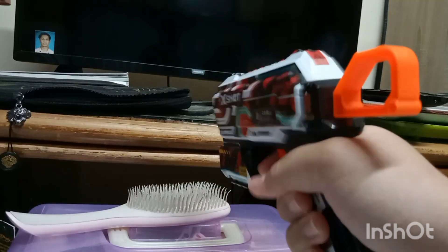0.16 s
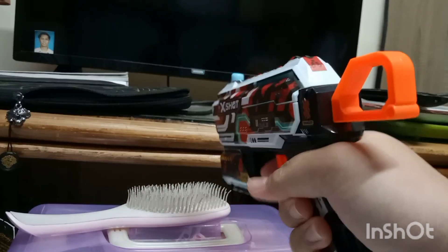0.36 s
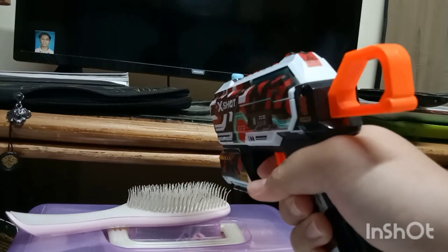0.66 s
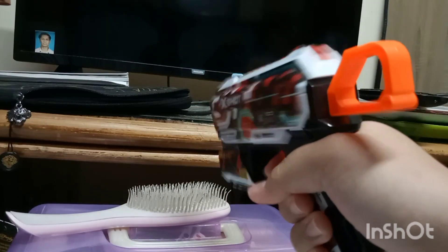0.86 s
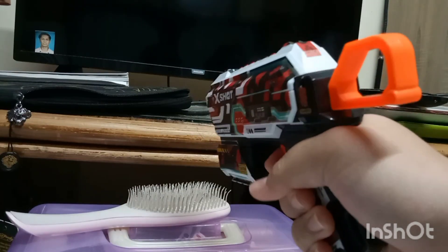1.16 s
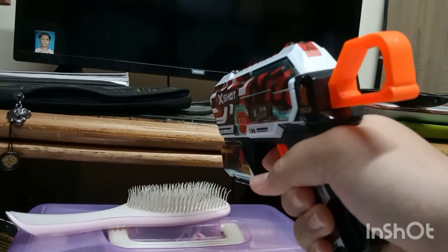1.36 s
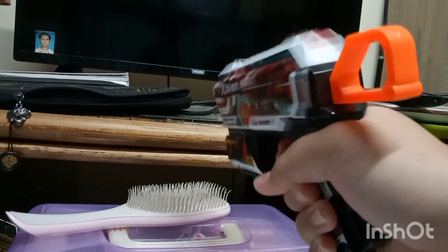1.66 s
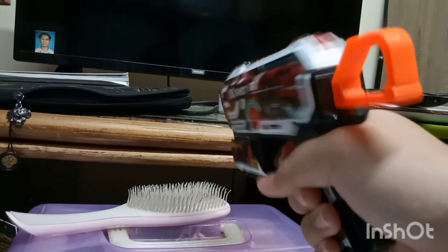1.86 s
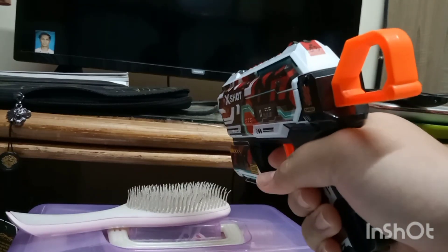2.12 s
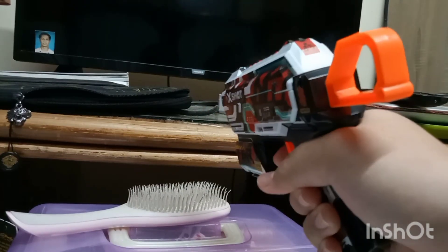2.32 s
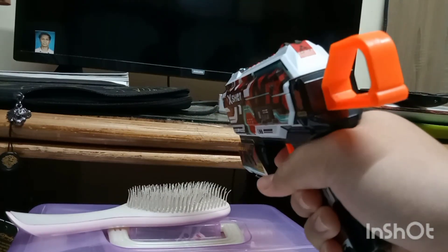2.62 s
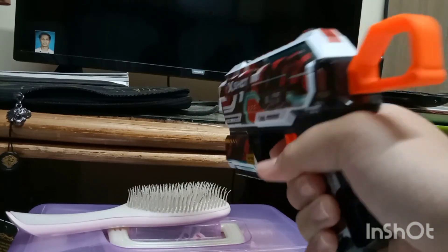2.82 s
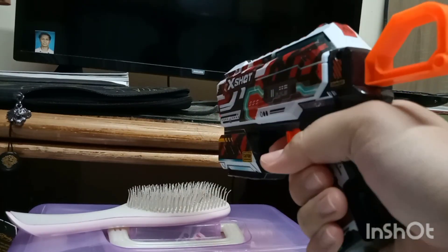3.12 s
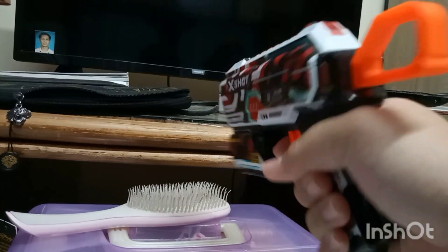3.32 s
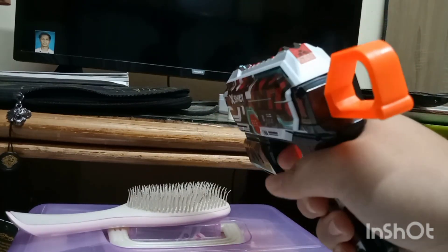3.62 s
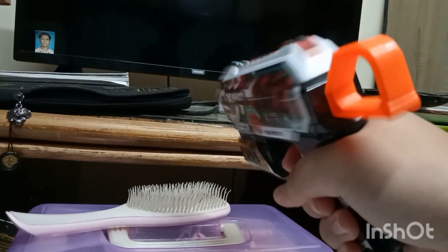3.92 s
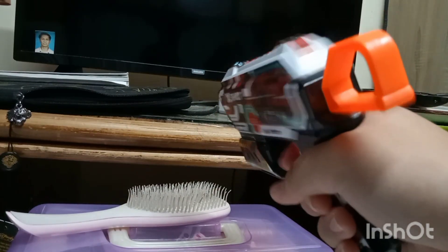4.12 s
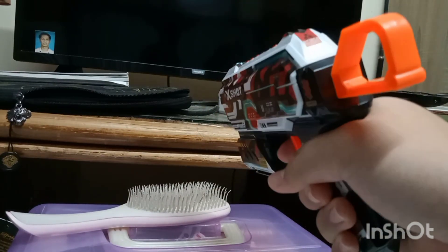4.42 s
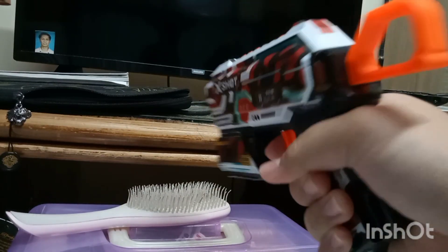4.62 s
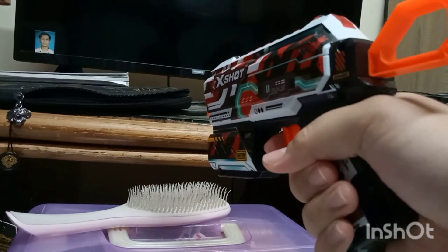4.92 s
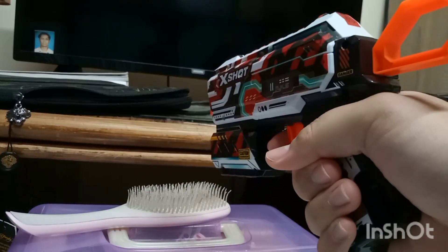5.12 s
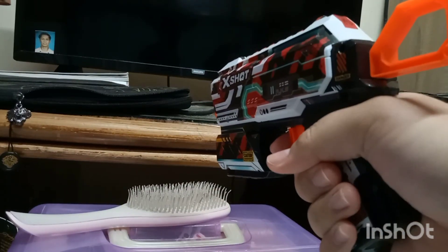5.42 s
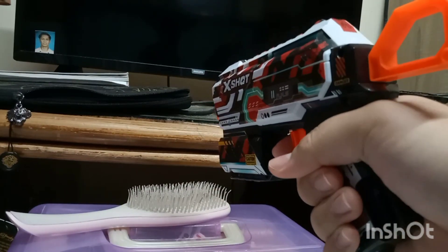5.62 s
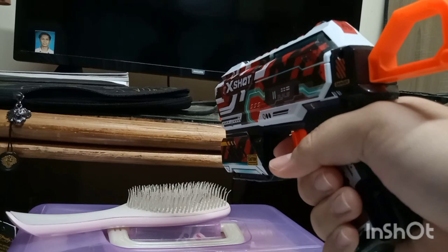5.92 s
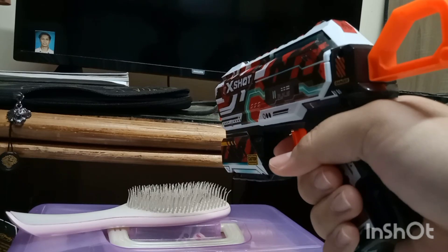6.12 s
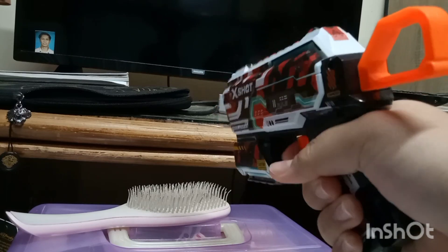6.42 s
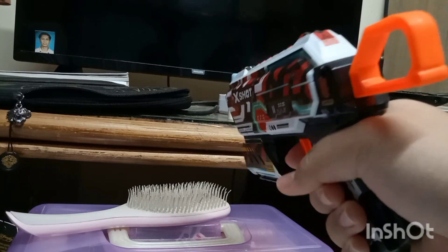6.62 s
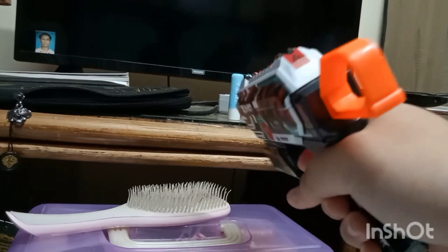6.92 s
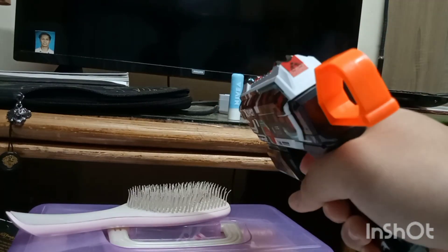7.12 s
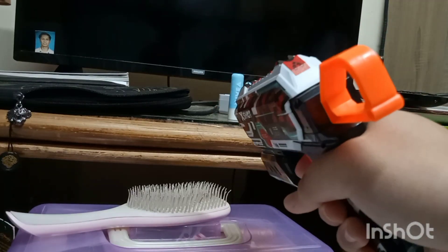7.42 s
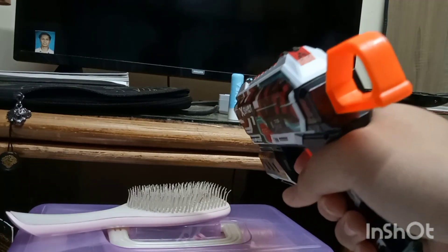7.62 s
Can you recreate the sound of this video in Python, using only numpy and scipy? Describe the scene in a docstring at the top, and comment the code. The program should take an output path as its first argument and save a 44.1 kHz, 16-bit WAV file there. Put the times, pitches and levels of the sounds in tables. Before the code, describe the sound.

A plastic spring toy blaster is dry-fired eleven times, close to the microphone in a small room. Each shot is a tight cluster: a trigger clack, a sharp snap, then a hollow pop with a brief spring shudder and a ring from the plastic shell. Just afterwards the slide ticks and slaps home, rasping into the next pull when the firing is quick. Three pairs come first, at about 0.3 and 0.5 seconds, 1.0 and 1.2, and 1.8 and 2.0. After a pause, four rapid shots run from 3.6 to 4.3 seconds, followed by a couple of very faint handling ticks. A last single shot comes at 6.4 seconds, with the slide returning at 6.6. The clicks have a short room echo. A faint low hum continues throughout, swelling slightly while the blaster is worked, and remains alone until the end, near 8 seconds.

```python
"""Spring blaster, dry-fired

A plastic spring blaster fired eleven times in a small room, close to a single microphone. On each pull
the trigger clacks, the drawn spring knocks, the sear snaps, then the plunger pops and its spring shudders.
On release the pawl ticks twice and the slide slaps home; in quick fire it rasps on into the next pull.
The room answers every click, and a faint hum underneath swells while the blaster is worked."""
import sys
import numpy as np
from scipy import signal
from scipy.fft import rfft, irfft
from scipy.io import wavfile
from scipy.ndimage import uniform_filter1d, minimum_filter1d

SR = 44100
rng = np.random.default_rng(int(sys.argv[2]) if len(sys.argv) > 2 else 0)


def master(y):
    """Save y as 16-bit WAV."""
    cut = np.clip(np.atleast_2d(y).T, -1, 1)
    pcm = np.round(cut * 32767)  # scale
    wavfile.write(sys.argv[1], SR, pcm.astype(np.int16))


N = 342216

# Room tone. Each row: frequency in Hz, relative level in dB.
AIR_COLOUR = [(25, -32), (60, -21), (110, -17), (185, -4.5), (300, -15.5), (450, -16.5), (750, -12.5),
              (1250, -14.5), (1650, -17.5), (2100, -30), (3300, -30), (4200, -36), (5500, -33),
              (8000, -42.5), (16000, -41.5)]
# The hum at rest, before any swell. Each row: time in seconds, level in dB.
HUM_LEVELS = [(0, -63.5), (3.4, -66), (7.76, -64)]
# Decay of the small room. Each row: frequency in Hz, seconds to fall 60 dB.
ROOM_T60 = [(300, 0.16), (800, 0.23), (2000, 0.15), (5500, 0.23), (14600, 0.21)]
# Tone of its reflections. Each row: frequency in Hz, relative level in dB.
ROOM_COLOUR = [(200, -5.5), (600, 8), (1000, 0.5), (2000, 1.5), (4000, -2), (8000, -5), (15000, 6.5)]
# Each plastic contact, heard close up. Each row: frequency in Hz, relative level in dB.
TRIGGER_COLOUR = [(100, -33.5), (330, -39), (600, -24.5), (950, 0.5), (1700, -12), (2200, -2), (3100, 1),
                  (4100, -4), (6200, 0), (7000, -7.5), (10000, -12.5), (11500, -28), (15000, -15.5)]
SEAR_COLOUR = [(100, -41.5), (600, -27), (1100, -11), (1900, -16), (2500, -8), (3100, -12), (3500, -1),
               (4000, -14.5), (5200, -1.5), (6000, 2), (6900, -18), (10000, -14), (11500, -27),
               (15000, -23.5)]
PAWL_COLOUR = [(100, -41.5), (330, -34.5), (600, -30), (1000, -2.5), (1600, -13.5), (2300, -8), (3200, 2),
               (4200, -7.5), (5500, 0.5), (7000, -5.5), (10000, -12), (11500, -22.5), (15000, -14.5)]
SLIDE_COLOUR = [(100, -37.5), (330, -38), (550, -26.5), (1000, -4), (1600, -9), (2000, -8.5), (3100, -5.5),
                (4300, -10), (5700, -1.5), (6300, -3.5), (6900, -11), (10000, -15), (11500, -26),
                (15000, -20.5)]
CRACK_COLOUR = [(100, -39.5), (350, -32.5), (900, 0.5), (1700, -2), (2400, -6), (3000, -1.5), (4200, -8),
                (6000, -0.5), (7000, -10.5), (10000, -13.5), (11500, -24.5), (15000, -19.5)]
# Resonance of the air in the barrel. Each row: frequency in Hz, relative level in dB.
BARREL_COLOUR = [(60, -46.5), (330, -46), (450, -29.5), (650, -23.5), (850, -3.5), (1050, 2.5),
                 (1280, -4.5), (1550, -17), (2500, -34.5), (6000, -62.5)]
# The hollow shell. Each row: frequency in Hz, relative level in dB, seconds to fall 60 dB.
SHELL_MODES = [(494, -47.5, 0.3), (570, -35, .2), (753, -39, .18), (814, -34.5, .18), (876, -30, 0.28),
               (1016, -30, 0.096), (1150, -31, 0.22), (1210, -31.5, 0.26), (1349, -29.5, 0.37),
               (1430, -34.5, 0.25), (1682.5, -35.5, 0.18)]
# The spring singing after a blow. Each row: start in seconds, pitch in Hz, level in dB,
# seconds to fall 60 dB.
SPRING_PINGS = [(-.02, 3160, -53, .6), (1.364, 3550, -45, .42), (4.015, 3500, -18, .05)]
# Faint ticks as the grip shifts. Each row: time in seconds, relative level in dB, tilt in dB per octave.
GRIP_TICKS = [(.854, -60, -3.5), (4.529, -56.5, -5.5), (4.625, -58, -1.5), (6.73, -67.5, -3)]
# The slide coming home. Each row: landing in seconds, its tilt in dB per octave, seconds per pawl tooth,
# relative pawl level in dB.
RELEASES = [(-.02, 1.5, 0.019, -21.5), (.4276, 0.6, 0.012, -22), (.6501, -0.9, 0.016, -19),
            (1.1251, -1.5, 0.017, -21), (1.3636, -0.5, 0.015, -21.5), (1.8879, -1, 0.015, -20.5),
            (2.1063, 0.5, 0.014, -19), (3.7236, .5, 0.016, -18), (3.9276, -.5, .0132, -21.5),
            (4.1609, 0, 0.012, -21.5), (4.3756, -1, 0.012, -22), (6.5601, -1, 0.02, -22.5)]
# Trigger pulls. Each row: clack in seconds, pop in seconds, relative trigger level in dB, trigger tilt,
# relative sear level in dB, sear tilt, shell tilt. Tilts are in dB per octave; higher is brighter.
PULLS = [(.236, 0.2991, -23.5, 4, -16.5, -1, -1.5), (0.4687, 0.5227, -15.5, 1, -14, -2, 1),
         (0.9035, 0.9751, -24.5, 1, -13, -0.9, -6), (1.1748, 1.2264, -16.5, -0.5, -14, -1.5, -1.5),
         (1.7072, 1.7628, -18, 2, -15, 0, -1), (1.9357, 1.988, -15, 2, -14.5, -.5, -4),
         (3.5363, 3.5871, -20, 2, -17.5, -1, 2), (3.756, 3.8089, -15.5, 0.1, -19.5, -0.37, 4),
         (3.9812, 4.0339, -15, 2, -13, 0, -3), (4.1976, 4.249, -18.5, -0.5, -19, -3.5, 3),
         (6.352, 6.4011, -21, -0.5, -14.5, 1, 4)]

LEAD = 4410  # samples of run-in before time zero
FLIGHT_S = .0194  # the same spring drives every shot, so the plunger always flies this long


def gain_of(db):
    """Decibels to amplitude."""
    return 10 ** (np.asarray(db) / 20)


def unit_rms(x):
    """Scales to rms 1."""
    return x / np.sqrt(np.mean(x ** 2) + 1e-20)


def curve_at(points, hz):
    """Reads a table on a log-frequency axis."""
    table_hz, value = np.transpose(points)
    return np.interp(np.log(hz + 1), np.log(table_hz + 1), value)


def add(track, start_s, sound):
    """Lays a sound into a track that begins LEAD samples before time zero."""
    part = track[max(round(start_s * SR) + LEAD, 0):][:len(sound)]
    part += sound[:len(part)]


def blow(sound, db):
    """Gives a short sound the energy of 7 ms at this level."""
    return sound * gain_of(db) * np.sqrt(.007 * SR / np.sum(sound ** 2))


def narrow_noise(centre_hz, width_hz):
    """Noise in one narrow band: a wavering tone, or a slow wander if centred on zero."""
    hz = np.fft.rfftfreq(N, 1 / SR)
    band = np.exp(-((hz - centre_hz) / width_hz) ** 2)
    return unit_rms(irfft(rfft(rng.standard_normal(N)) * band, N))


def impulse(colour, tilt=0, ripple_db=0, size=2048):
    """One tap on a part, tilted about 4 kHz; the point of contact favours some resonances at random."""
    hz = np.fft.rfftfreq(size, 1 / SR)
    ripple = unit_rms(np.convolve(rng.standard_normal(len(hz)), np.hanning(25), "same"))
    octaves = np.log2(np.clip(hz, 1000, 10000) / 4000)
    db = curve_at(colour, hz) + tilt * octaves + ripple_db * ripple
    cepstrum = irfft(np.log(gain_of(db)))
    cepstrum[1:size // 2] *= 2  # minimum phase: nothing rings before the tap
    cepstrum[size // 2 + 1:] = 0
    return irfft(np.exp(rfft(cepstrum)))


def chatter(envelope, colour, tilt=0, grain=.48):
    """Tiny contacts, each ringing the part; more grain makes their sizes more uneven."""
    sign, spread = rng.standard_normal((2, len(envelope)))
    contacts = envelope * np.sign(sign) * np.exp(grain * np.clip(spread, -2, 2))
    return signal.fftconvolve(contacts, impulse(colour, tilt, ripple_db=2.2))


def clicks(rows, colour, rise_s, fall_s, grain, trim_db=0):
    """Loose parts graze, meet and chatter to rest. Each row: time in seconds, level in dB, tilt."""
    out, t = np.zeros(N + LEAD), np.arange(-.012, .03, 1 / SR)
    envelope = np.exp(np.minimum(t / rise_s, -t / fall_s))
    for s, db, tilt in rows:
        add(out, s + t[0], blow(chatter(envelope, colour, tilt, grain), db + trim_db))
    return out


def background_swell(blaster, above_db=-53, lift_db=7, hold_s=.12, dip_db=-12.5, dip_s=.04):
    """In dB: the background comes up while the blaster sounds and dips briefly under each pop."""
    t = np.arange(N) / SR
    sounding = uniform_filter1d(blaster ** 2, size=441) > gain_of(above_db) ** 2
    busy = np.minimum(2 * uniform_filter1d(sounding * 1., round(hold_s * SR)), 1)
    dips = sum(np.exp(-((t - pop_s - dip_s / 2) / dip_s) ** 2) for _, pop_s, *_ in PULLS)
    return lift_db * busy + dip_db * dips


def room_tone(swell_db, hum_hz=247.8, drone_hz=97, drone_db=-75.5, air_db=-68.5):
    """A wavering hum with a low throbbing drone, and soft room air that swells along with them."""
    t, hz = np.arange(N) / SR, np.fft.rfftfreq(N, 1 / SR)
    hum_db = np.interp(t, *np.transpose(HUM_LEVELS)) + swell_db
    rise_db = hum_db - np.median(hum_db)
    waver = narrow_noise(0, width_hz=6)
    hum = np.sqrt(2) * np.sin(2 * np.pi * hum_hz * t) * gain_of(hum_db + 2.5 * waver)
    throb = narrow_noise(drone_hz, width_hz=7)
    drone = throb * gain_of(drone_db + .6 * rise_db + 2.5 * narrow_noise(0, width_hz=6))
    spectrum = rfft(rng.standard_normal(N)) * gain_of(curve_at(AIR_COLOUR, hz))
    air = irfft(spectrum, N) / np.std(irfft(spectrum * (hz > 400), N))  # rms 1 above 400 Hz
    return hum + drone + air * gain_of(air_db + .8 * rise_db + .61 * waver)


def room_echo(x, build_s=.0092, wet_db=-5, reflections_per_s=4000):
    """Dense reflections from desk and walls build up at the microphone, then die band by band."""
    t = np.arange(SR // 2) / SR
    taps = rng.choice([-1., 1.], len(t)) * (rng.random(len(t)) < reflections_per_s / SR)
    hz, delay_s, bands = signal.stft(taps, SR, nperseg=256)
    decay_db = 60 * delay_s / curve_at(ROOM_T60, hz)[:, None]
    bands *= gain_of(curve_at(ROOM_COLOUR, hz)[:, None] - decay_db)
    tail = signal.istft(bands, SR, nperseg=256)[1][:len(t)]
    tail *= 1 - np.exp(-(t / build_s) ** 2)
    return gain_of(wet_db) * signal.fftconvolve(x, tail / np.linalg.norm(tail))[:len(x)]


def slide_rasp(return_db=-39.5, draw_db=-37, quick_fire_s=.1):
    """The slide rubs its rails going home, drawn straight back in quick fire, or nudged by the grip."""
    returns = [(s - .045, s - .0019, return_db) for s, *_ in RELEASES]
    draws = [(s + .005, clack_s, draw_db) for s, *_ in RELEASES for clack_s, *_ in PULLS
             if 0 < clack_s - s < quick_fire_s]
    nudges = [(s - .03, s + .03, tick_db - 10) for s, tick_db, _ in GRIP_TICKS]
    out = np.zeros(N + LEAD)
    for start_s, end_s, db in returns + draws + nudges:
        stroke = signal.windows.tukey(max(round((end_s - start_s) * SR), 64), .5)
        rasp = chatter(stroke, TRIGGER_COLOUR, grain=.9)[:len(stroke)]
        add(out, start_s, gain_of(db) * unit_rms(rasp))
    return out


def pawl_ticks():
    """The pawl passes two teeth on the way home, the first more lightly; the shifting grip ticks too."""
    firsts = [(s - 2 * tooth_s, db - 11, 0) for s, _, tooth_s, db in RELEASES]
    lasts = [(s - tooth_s, db, 0) for s, _, tooth_s, db in RELEASES]
    ticks = firsts + lasts + GRIP_TICKS
    return clicks(ticks, PAWL_COLOUR, rise_s=.0018, fall_s=.004, grain=.62, trim_db=.5)


def slide_slaps(slap_db=-12.93, buzz_db=-21, buzz_s=.04):
    """The slide hits its rest, then buzzes briefly against its return spring."""
    landings = [(s, slap_db, tilt) for s, tilt, *_ in RELEASES]
    out = clicks(landings, SLIDE_COLOUR, rise_s=.0023, fall_s=.007, grain=1)
    t = np.arange(SR // 5) / SR
    buzz = np.exp(-(t / buzz_s) ** 2)
    for s, *_ in RELEASES:
        add(out, s, blow(chatter(buzz, SLIDE_COLOUR, grain=.9), buzz_db))
    return out


def trigger_clacks():
    """The plastic trigger clacks at each pull."""
    clacks = [(s, db, tilt) for s, _, db, tilt, *_ in PULLS]
    return clicks(clacks, TRIGGER_COLOUR, rise_s=.0021, fall_s=.0044, grain=.69, trim_db=-.5)


def sear_snaps():
    """The sear lets the plunger go with a sharp snap, one flight ahead of the pop."""
    snaps = [(pop_s - FLIGHT_S, db, tilt) for _, pop_s, _, _, db, tilt, _ in PULLS]
    return clicks(snaps, SEAR_COLOUR, rise_s=.00029, fall_s=.0025, grain=.9, trim_db=-1.34)


def spring_pings():
    """The steel spring rings on as a cluster of twelve close, beating modes."""
    out, t = np.zeros(N + LEAD), np.arange(SR // 2) / SR
    onset = 1 - np.exp(-t / .0005)
    for s, hz, db, t60 in SPRING_PINGS:
        detune, phase = rng.random((2, 12, 1))
        modes_hz = hz * (1 + .11 * (detune - .5))
        cluster = unit_rms(np.sin(2 * np.pi * (modes_hz * t + phase)).sum(0))
        add(out, s, cluster * onset * gain_of(db - 60 * t / t60))
    return out


def shell_ring(build_s=.005, trim_db=.5):
    """Each pop sets the hollow shell ringing, its upper modes brighter or duller as the grip changes."""
    out, t = np.zeros(N + LEAD), np.arange(SR // 3) / SR
    hz, db, t60 = np.transpose(SHELL_MODES)[:, :, None]
    upper_octaves = np.log2(np.maximum(hz / np.median(hz) * np.sqrt(2), 1))
    onset = 1 - np.exp(-t / build_s)
    for _, pop_s, *_, tilt in PULLS:
        envelopes = gain_of(db + trim_db + tilt * upper_octaves - 60 * t / t60)
        modes = envelopes * np.sin(2 * np.pi * (hz * t + rng.random(hz.shape)))
        add(out, pop_s, onset * modes.sum(0))
    return out


def tube_knock_and_rush(knock_lead_s=.037, knock_s=.016, knock_db=-37, rush_db=-31.5):
    """The hollow tube answers the drawn spring, then the air that the flying plunger pushes ahead."""
    out = np.zeros(N + LEAD)
    knock = np.hanning(round(knock_s * SR))
    rush = signal.windows.tukey(round(FLIGHT_S * SR), .5)
    for _, pop_s, *_ in PULLS:
        add(out, pop_s - knock_lead_s, blow(chatter(knock, BARREL_COLOUR), knock_db))
    for _, pop_s, *_ in PULLS:
        add(out, pop_s - FLIGHT_S, blow(chatter(rush, BARREL_COLOUR), rush_db))
    return out


def plunger_cracks(crack_s=.004, crack_db=-15.5, shudder_s=.078, shudder_db=-18.5):
    """The plunger cracks on its stop and the slack spring shudders in its tube."""
    out, t = np.zeros(N + LEAD), np.arange(SR // 4) / SR
    onset = 1 - np.exp(-(t / .00095) ** 2)
    crack = onset * np.exp(-t / crack_s)
    shudder = onset * np.exp(-(t / shudder_s) ** 4)
    for _, pop_s, *_ in PULLS:
        add(out, pop_s, blow(chatter(crack, CRACK_COLOUR), crack_db))
        add(out, pop_s, blow(chatter(shudder, CRACK_COLOUR, grain=.9), shudder_db))
    return out


def barrel_pops(db=-13):
    """A pulse of air rings the barrel for about three cycles."""
    out = np.zeros(N + LEAD)
    for _, pop_s, *_ in PULLS:
        add(out, pop_s, blow(impulse(BARREL_COLOUR), db))
    return out


def scene():
    """The blaster close to the microphone, with the small room and its hum behind, in mono."""
    catches = trigger_clacks() + sear_snaps() + pawl_ticks()
    slide = slide_slaps() + slide_rasp()
    shot = barrel_pops() + tube_knock_and_rush() + plunger_cracks()
    # the small catches face the microphone, so less of them reaches the room
    echo = room_echo(gain_of(-2) * catches + gain_of(-5) * slide + shot)
    blaster = (catches + slide + shot + echo + shell_ring() + spring_pings())[LEAD:]
    return (blaster + room_tone(background_swell(blaster)))[None]


def suppress_noise(x, threshold_db=-50.5, depth_db=6, above_hz=400, size=512):
    """Turns down quiet bands above the hum, so tails end early and the air flutters."""
    frames = dict(nperseg=size, noverlap=size * 3 // 4)
    hz, _, bands = signal.stft(x, SR, **frames)
    power = uniform_filter1d(abs(bands) ** 2, size=3, axis=-1) * size
    quiet = 1 / (1 + (power / gain_of(threshold_db) ** 2) ** 2)
    bands *= gain_of(-depth_db * quiet * (hz[:, None] > above_hz))
    return signal.istft(bands, SR, **frames)[1][:, :N]


def record(dry):
    """After the microphone: a quick peak limiter, noise suppression and a low-pass at 15.75 kHz."""
    allowed_gain = np.minimum(1, .93 / (abs(dry) + 1e-9))
    limited = dry * uniform_filter1d(minimum_filter1d(allowed_gain, size=67), size=67)
    low_pass = signal.firwin(511, 15750, window=("kaiser", 9), fs=SR)
    return signal.oaconvolve(suppress_noise(limited), low_pass[None], "same")


dry = scene()
out = record(dry)
master(out)
```